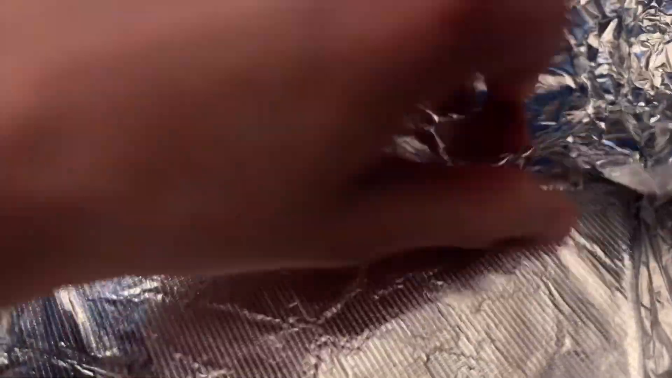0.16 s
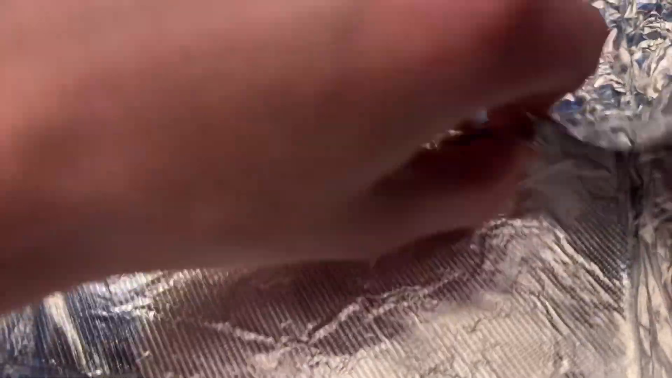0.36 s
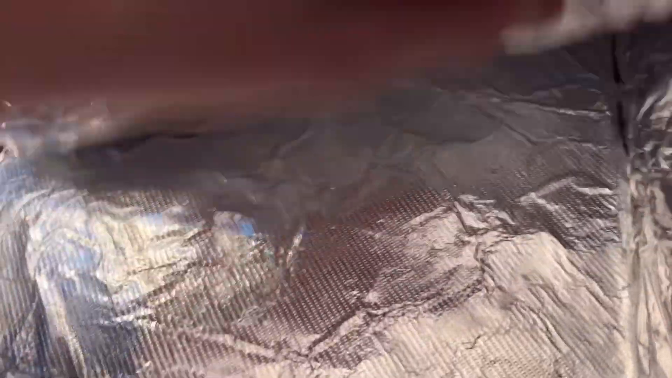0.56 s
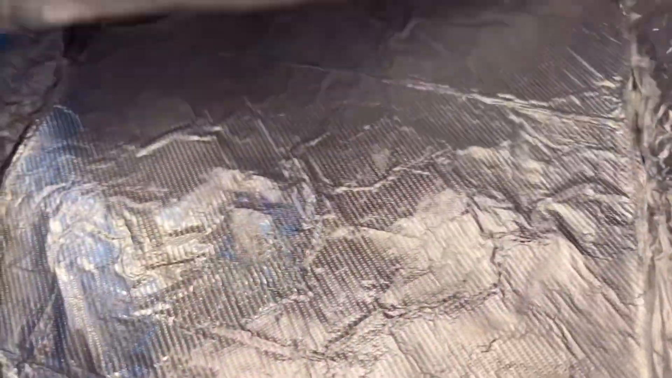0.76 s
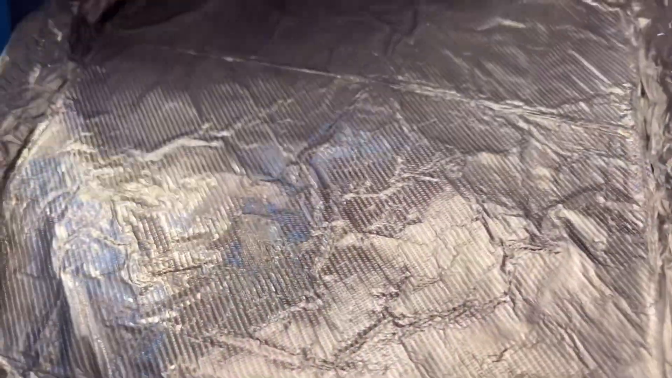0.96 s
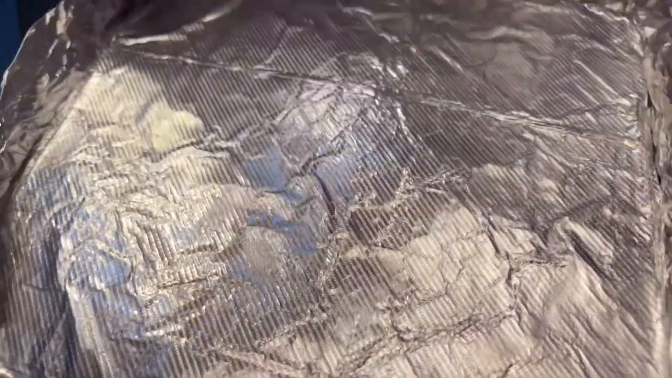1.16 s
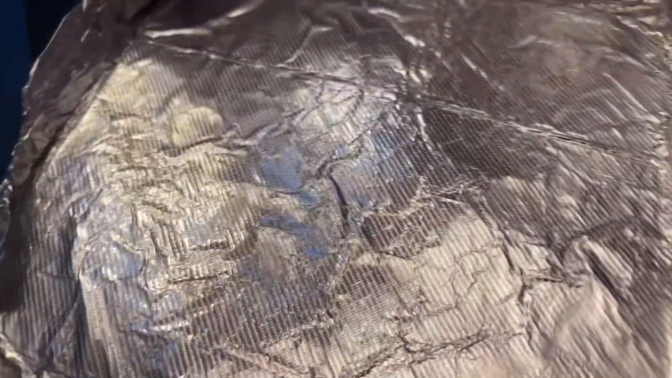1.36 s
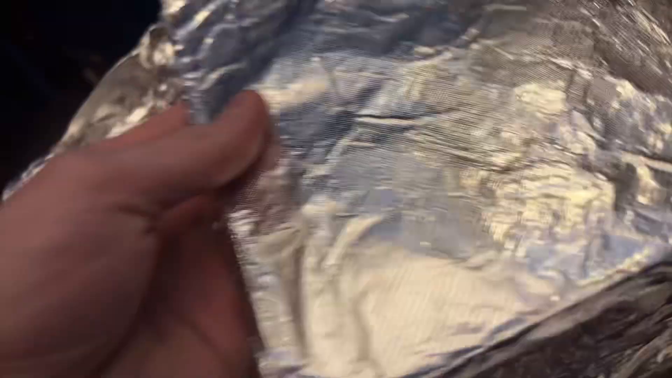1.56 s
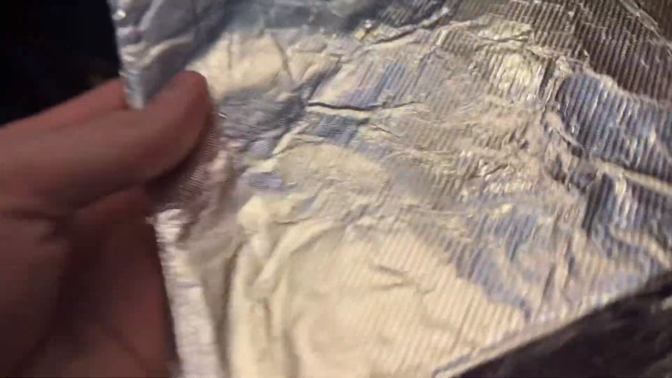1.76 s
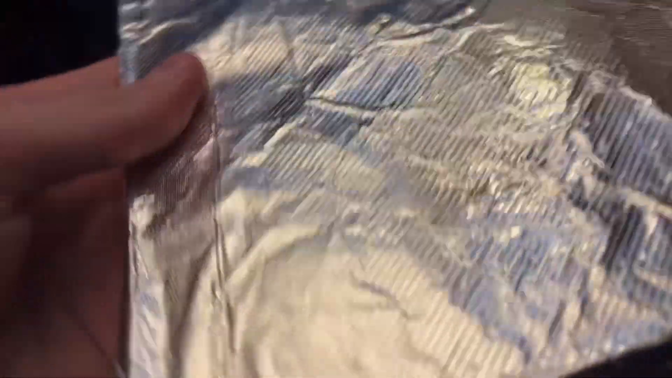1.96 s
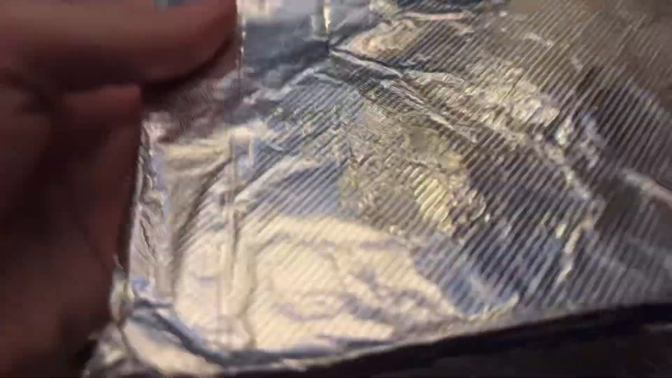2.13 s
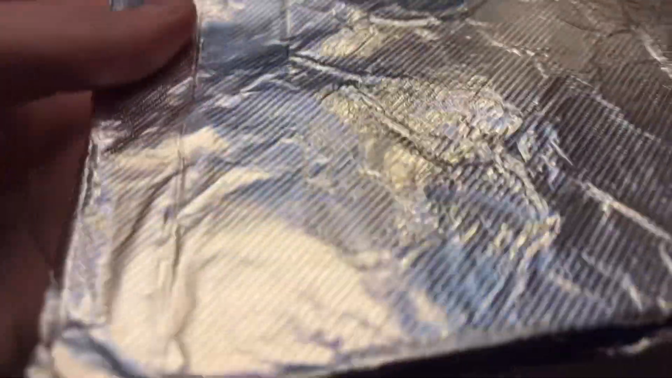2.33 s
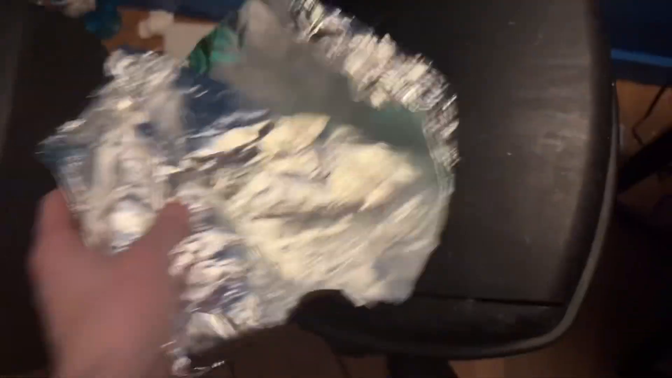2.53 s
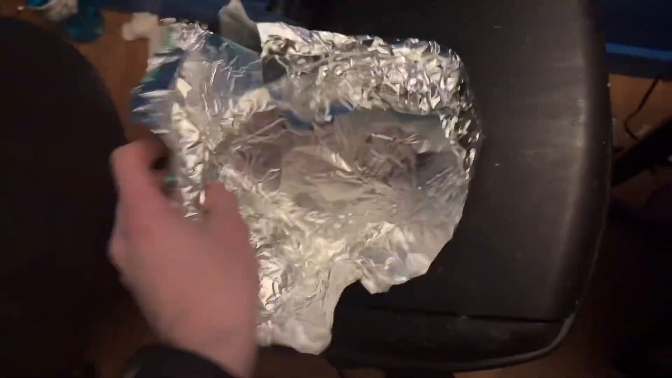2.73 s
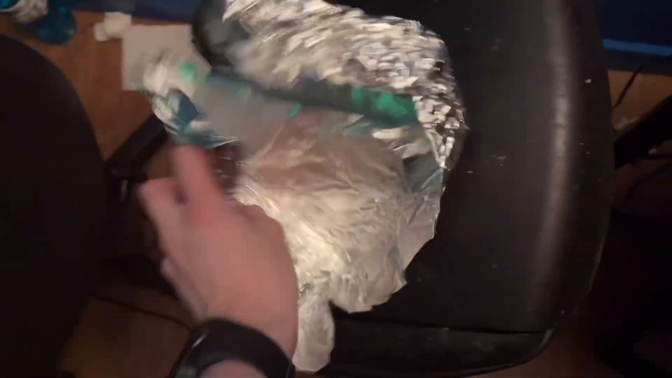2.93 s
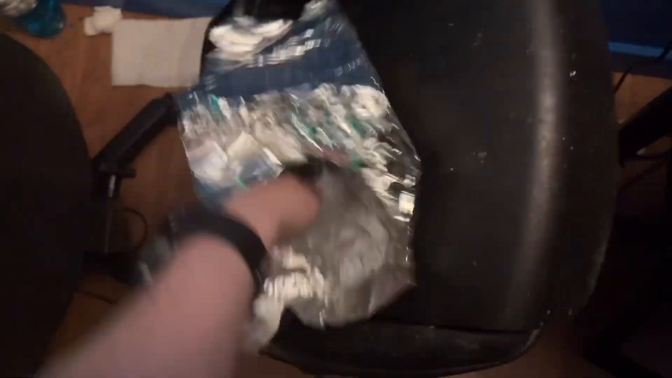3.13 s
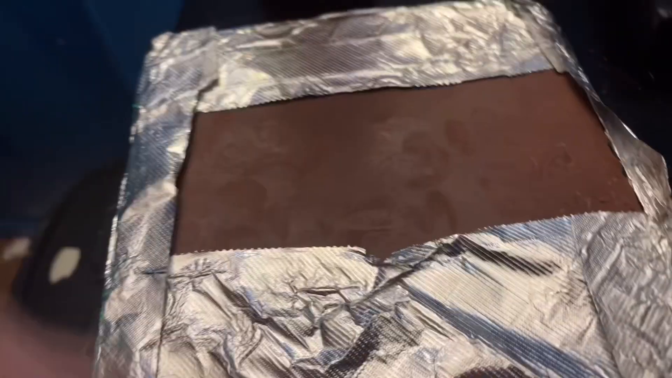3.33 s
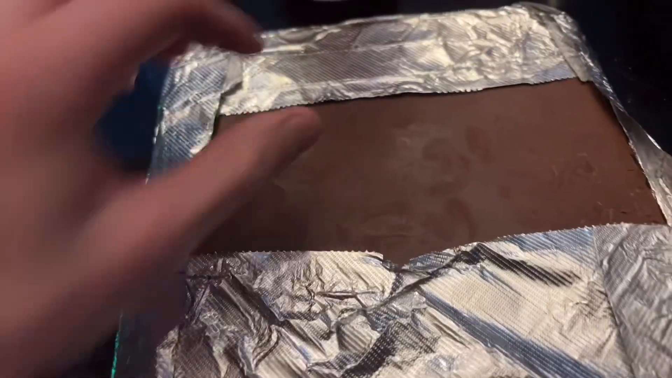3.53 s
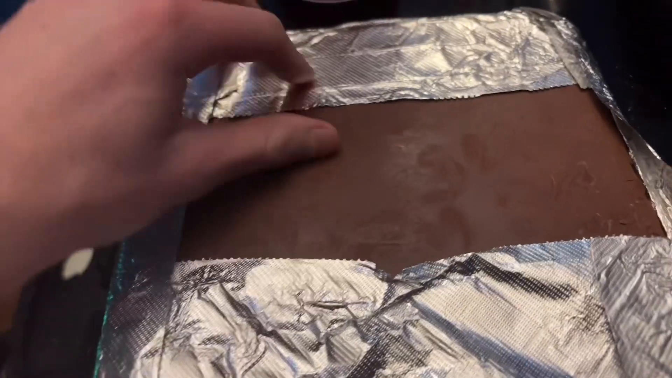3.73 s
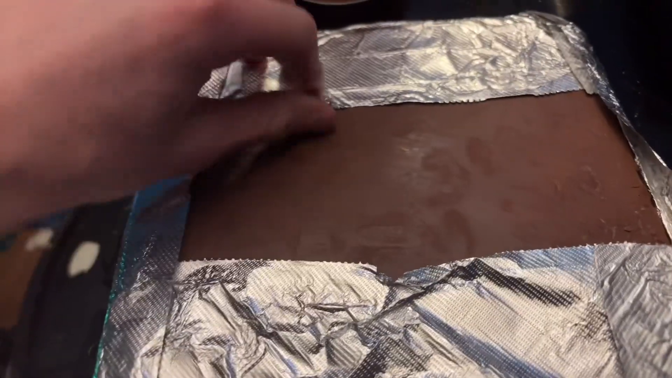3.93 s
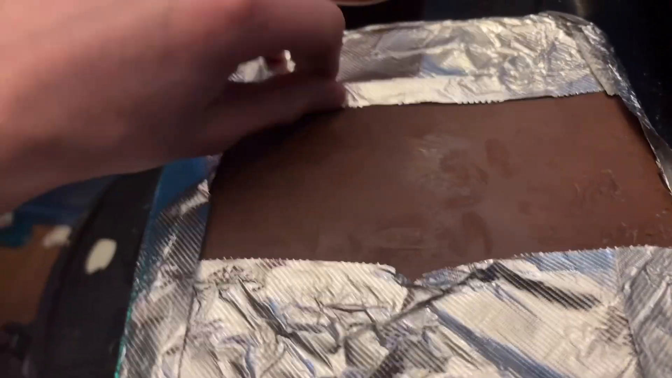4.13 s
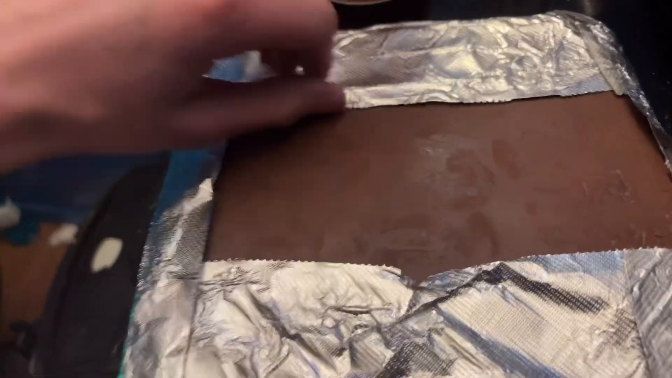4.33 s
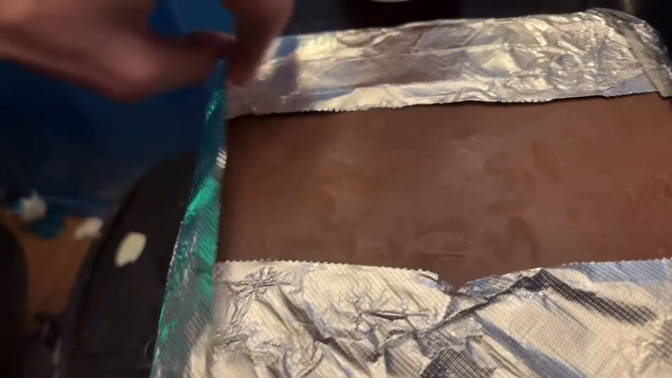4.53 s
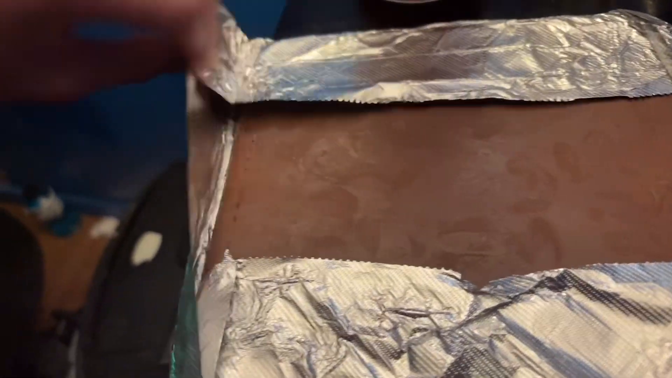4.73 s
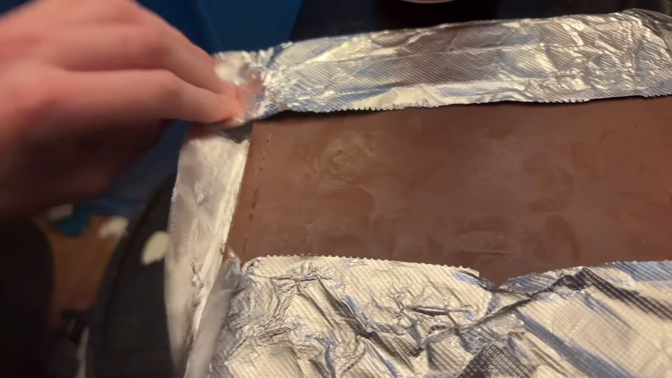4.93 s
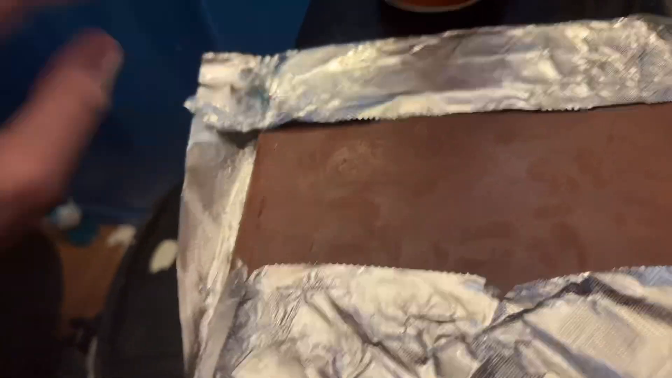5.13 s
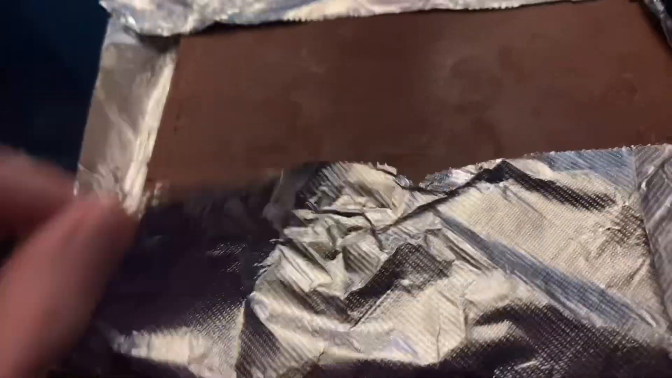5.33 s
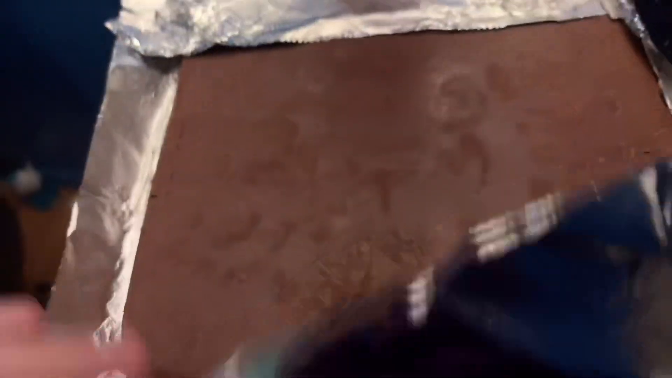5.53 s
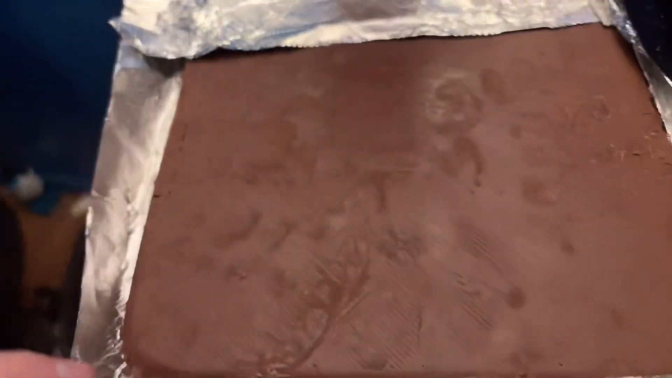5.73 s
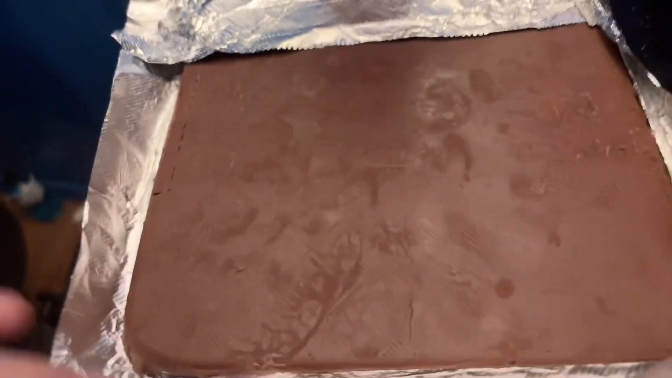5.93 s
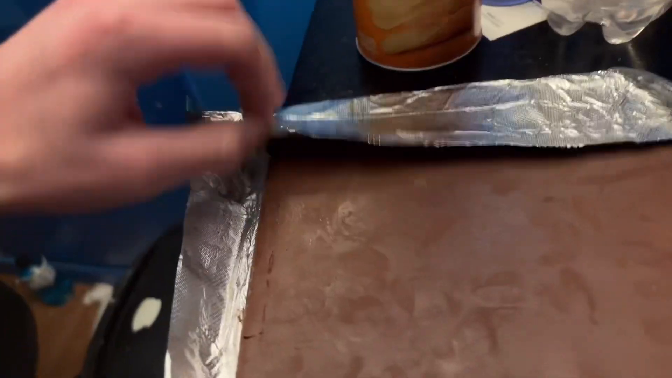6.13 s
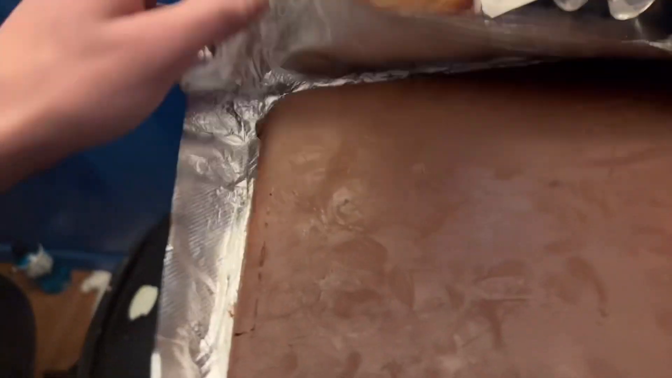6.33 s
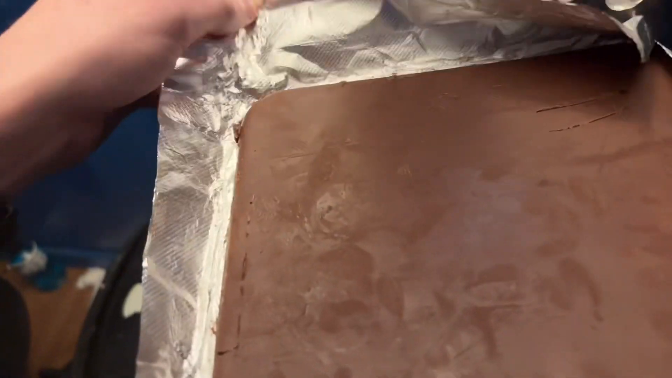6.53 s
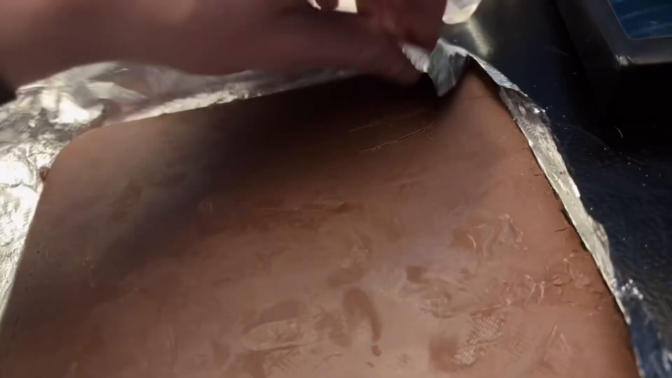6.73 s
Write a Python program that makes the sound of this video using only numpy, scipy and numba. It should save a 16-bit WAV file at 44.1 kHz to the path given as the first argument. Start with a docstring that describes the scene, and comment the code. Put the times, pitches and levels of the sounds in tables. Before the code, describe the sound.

Close, crisp crackling of foil being unwrapped from a chocolate slab, in stop-start spells over low flapping and soft microphone bumps.

```python
"""Aluminium foil is peeled, crumpled and torn by hand, close up in a quiet room.
Each crease buckles with a click that rings small patches of the sheet; big snaps set off showers of
smaller ones, and the sheet flaps in the bass. There are dull taps and pops, the loudest a finger
tapping a phone. The phone is also bumped now and then, and the room hums faintly.
The sound comes in short stretches that start and stop abruptly."""
import sys
import numpy as np
from scipy import signal
from scipy.fft import rfft, irfft
from scipy.io import wavfile
from scipy.ndimage import uniform_filter1d, minimum_filter1d
from numba import njit

SR = 44100
rng = np.random.default_rng(int(sys.argv[2]) if len(sys.argv) > 2 else 0)


def store_wav(level_fs):
    """Save 16-bit WAV to argv[1]."""
    pcm = np.round(np.clip(np.atleast_2d(level_fs), -1, 1) * 32767)
    wavfile.write(sys.argv[1], SR, pcm.T.astype(np.int16))


N = 298985

# Big snaps of the foil. "Sizzle" is the sound above 7 kHz, "body" the sound below 1 kHz.
# t/s, level/dB, f/Hz, relative sizzle/dB, shower length/s, relative shower level/dB
SNAPS = [(.058, -30, 3490, -20, 0.028, -11), (.1075, -16.5, 3690, -20, 0.0091, -9),
         (0.1195, -25, 3600, -31, 0.012, -2), (0.1333, -13, 3600, -21, 0.024, -9),
         (0.1645, -13.5, 3590, -17, 0.016, -11), (.186, -13, 4200, -35, .011, -9.5),
         (.21, -18, 2840, -23, 0.015, -1.5), (0.2245, -15, 3440, -25, 0.0059, -4),
         (0.241, -25, 4020, -13, 0.0093, -15), (.255, -10.5, 3870, -28, 0.0069, -19),
         (0.3395, -15, 3920, -26, 0.0031, -24), (0.3625, -9.5, 3650, -17, 0.0032, -25),
         (0.431, -26, 3460, -18, 0.0064, 2.5), (0.4423, -12.5, 3140, -23, 0.0069, -20),
         (.4583, -16, 4200, -22, .006, -0.5), (.4652, -7.5, 2080, -36, .011, -24),
         (0.523, -20.5, 3550, -24, .008, -2), (0.533, -16, 3960, -24, .008, -7),
         (0.577, -10.5, 2740, -44, .008, -1), (0.583, -16.5, 2900, -23.5, 0.037, -0.5),
         (0.6293, -19.5, 4040, -18, 0.0078, -0.5), (0.634, -19.5, 2800, -40, .035, -5),
         (0.668, -22, 3390, -33, 0.0083, 3), (0.681, -21, 2700, -17, 0.01, 1),
         (0.693, -13, 3160, -30, 0.02, -5), (0.7208, -8, 2070, -35, .01, 1.5),
         (0.725, -11.5, 3220, -27, 0.0087, 6), (.797, -13.5, 2980, -42, .01, -16),
         (0.811, -10.5, 2720, -22, 0.041, -11), (0.8838, -11.5, 2600, -50, 0.014, -8),
         (.935, -5.5, 2550, -25, 0.022, -11), (1.0004, -15.5, 3100, -29, .008, 3.5),
         (1.008, -16, 3410, -33, 0.0047, -10), (1.043, -14, 2950, -36, .004, -6),
         (1.063, -14.5, 2560, -33, 0.0067, 5.5), (1.074, -10.5, 3050, -23, 0.016, 0),
         (1.093, -12, 1850, -31, 0.023, -10), (1.115, -6, 2780, -43, .018, -2.5),
         (1.1312, -9, 1630, -40, 0.0084, 2.5), (1.161, -17, 2940, -31, 0.028, -7),
         (1.184, -12.5, 3360, -23, 0.01, -2), (1.197, -9, 3300, -29, 0.036, -8),
         (1.27, -13, 3530, -38, .025, -10.5), (1.301, -25, 3050, -24, 0.012, 6),
         (1.308, -17, 2270, -41, 0.027, -6.5), (1.398, -18, 1950, -38, 0.015, -2.5),
         (1.407, -21, 3060, -38, 0.012, -5), (1.434, -3, 3530, -30, 0.019, -7.5),
         (1.48, -14, 2400, -37, 0.028, -22), (1.517, -27.5, 2900, -18, 0.02, 2),
         (1.538, -6, 4430, -20, 0.0037, -13), (1.589, -24, 3300, -31, 0.014, -7),
         (1.598, -15, 2120, -47, 0.0052, -7), (1.938, -19, 3670, -38, 0.047, -18),
         (1.979, -27.5, 2770, -30, 0.021, 3), (1.997, -12.5, 3300, -30, 0.0049, -12),
         (1.9985, -16.5, 3320, -31, 0.025, -7.5), (2.065, -20, 3160, -31, 0.026, -7),
         (2.171, -23.5, 2170, -50, 0.021, 0.5), (2.249, -31, 3180, -41, 0.036, 1.5),
         (2.312, -22.5, 4000, -28, .016, -5.5), (2.328, -15, 1890, -45, 0.051, -15),
         (2.38, -21, 1420, -50, 0.019, -11), (2.464, -12.5, 2600, -34, .021, -1.5),
         (2.495, -16, 3190, -26, .01, -13), (2.5056, -17, 2880, -43, 0.041, -2),
         (2.5495, -15, 2390, -34, 0.047, -6), (2.597, -14, 2550, -41, 0.023, -7.5),
         (2.6636, -15.5, 2600, -36, 0.039, -23), (2.718, -16.5, 3020, -35, 0.014, -3),
         (2.768, -23.5, 3520, -25, 0.009, -4.5), (2.84, -22, 2800, -33, 0.011, -3),
         (2.877, -21.5, 2820, -28, 0.013, -1), (2.952, -11.5, 2190, -43, 0.03, -14),
         (2.991, -10, 2180, -37, 0.028, 1), (3.03, -5.5, 2200, -43, 0.0083, -7),
         (3.0462, -2.5, 2570, -34, .035, -9), (3.118, -10, 2360, -55, 0.024, -1.5),
         (3.148, -3.5, 2330, -51, 0.018, -19), (3.17, -7, 2140, -49, 0.039, -19.5),
         (3.208, -23, 2580, -41, 0.0068, -18), (3.261, -20.5, 1960, -38, 0.037, -2.5),
         (3.6674, -41, 2430, -33, 0.0048, 0), (3.6711, -23.5, 2370, -39, 0.018, -6),
         (3.732, -36, 2460, -36, 0.0086, -7), (3.826, -43.5, 2800, -30, 0.033, 0.5),
         (3.879, -33.5, 1610, -31, 0.03, -13), (3.961, -30.5, 3030, -39, 0.014, -8),
         (4.0693, -34, 2460, -31, 0.0092, 0), (4.0826, -31.5, 3180, -34, 0.0062, 0.5),
         (4.0903, -31, 3200, -22, 0.012, -8), (4.113, -30, 1580, -18, 0.0038, -9),
         (4.216, -42, 2410, -29, 0.031, -6), (4.258, -47, 3000, -15, 0.03, -1),
         (4.295, -28, 2590, -40, 0.0065, -15), (4.3484, -33.5, 2230, -28, 0.0083, -11),
         (4.366, -28.5, 2650, -24, 0.02, -9), (4.425, -36, 2740, -32, 0.012, -9),
         (4.442, -36, 2500, -38, 0.0097, -8), (4.465, -26.5, 2400, -38, .006, -11),
         (4.4724, -24, 2800, -32, 0.0098, -17), (4.4966, -21.5, 2350, -49, 0.0027, -14),
         (4.5185, -16.5, 3280, -36, .004, -21), (4.532, -14.5, 2500, -40, .011, -16),
         (4.55, -17, 2580, -35, 0.013, -10), (4.577, -31, 3300, -46, 0.0081, -5),
         (4.603, -23, 2510, -36, 0.0034, -8), (4.612, -27, 2660, -39, .012, -5),
         (4.664, -19, 2350, -48, 0.0081, -15.5), (4.679, -18, 2390, -41, 0.02, -6.5),
         (4.729, -26.5, 2460, -35, 0.0054, -21), (4.7615, -28.5, 2520, -32, 0.0086, -4),
         (4.772, -18.5, 2460, -48, .006, -27), (4.792, -19.5, 2460, -36, 0.014, -3),
         (4.842, -13, 2480, -48, 0.0079, -3), (4.854, -9.5, 3100, -27, 0.018, -10.5),
         (4.871, -9, 2380, -43, 0.012, -14), (4.899, -12, 2680, -36, 0.0072, -22),
         (4.9082, -23, 2190, -46, 0.0096, 0.5), (4.918, -11, 2590, -48, .007, -25),
         (4.94, -14, 2780, -46, 0.01, -29), (4.968, -25, 2480, -46, 0.037, -3.5),
         (5.183, -26, 2300, -37, 0.016, -17), (5.1922, -20, 2630, -27.5, 0.0088, 1),
         (5.201, -20, 2310, -37, 0.015, -12), (5.2382, -5, 3300, -36, 0.0033, -21),
         (5.265, -12, 1530, -33, 0.017, -15), (5.291, -23, 2880, -45, 0.008, 3.5),
         (5.3014, -20, 2970, -27, 0.018, 1), (5.331, -22.5, 2120, -46, 0.021, -5),
         (5.379, -40, 3360, -16, 0.014, -6), (5.3932, -7, 2750, -42, 0.013, -14),
         (5.417, -28.5, 2870, -41, 0.028, -2), (5.448, -19, 2170, -25.5, 0.017, -4),
         (5.49, -27.5, 2800, -40, 0.012, 0), (5.5185, -19.5, 3030, -44, 0.0077, 4.5),
         (5.5283, -14, 1770, -43, 0.013, -10), (5.539, -14, 2230, -43, 0.02, -5.5),
         (5.557, -17.5, 2460, -40, 0.031, -15), (5.5833, -12, 2550, -31.5, 0.015, -4.5),
         (5.606, -21, 2460, -38, 0.022, -11), (5.6524, -21.5, 1340, -34, 0.0055, 0),
         (5.665, -12.5, 2190, -34, 0.0066, -4), (5.67, -14, 3500, -30, 0.019, -7),
         (5.697, -22, 2780, -40, .01, -4), (5.71, -27, 2800, -42, 0.014, -14),
         (5.8, -28.5, 2500, -45, 0.022, -9), (5.836, -28, 2590, -34, 0.028, -24),
         (5.9986, -30, 1920, -28, 0.0073, -5), (6.027, -29.5, 2740, -42, 0.023, -8),
         (6.062, -37, 3000, -21, 0.011, -5), (6.1462, -29.5, 3040, -24, 0.016, -5.5),
         (6.16, -19, 2800, -37, 0.0079, -5), (6.2, -31.5, 2800, -34, 0.0075, -1),
         (6.219, -26.5, 3900, -26, .016, -3), (6.24, -26, 2500, -38, 0.011, 0),
         (6.254, -19.5, 2930, -37, 0.018, -1), (6.282, -34, 3050, -38, 0.0087, -17),
         (6.292, -21, 2650, -36, 0.025, 1), (6.3243, -12, 2630, -34, .012, -6.5),
         (6.336, -14.5, 1450, -37, 0.0078, -6), (6.343, -17, 3000, -35, 0.0089, 1),
         (6.354, -18, 2900, -45, 0.01, 1), (6.363, -18, 2940, -29, 0.0041, 2),
         (6.382, -15, 3340, -31, .016, -16), (6.4023, -4, 2440, -42, 0.0063, -6),
         (6.409, -6, 3070, -36, .006, -12), (6.415, -12, 2900, -53, .005, 1),
         (6.449, -10, 2920, -42, 0.0086, -11), (6.4626, -6.5, 2630, -45, 0.0093, -16),
         (6.4774, -9.5, 2270, -40, 0.022, -6), (6.504, -3, 2800, -43, 0.0093, -10),
         (6.572, -19.5, 2800, -42, 0.016, -3.5), (6.596, -14.5, 1420, -46, 0.0061, -15),
         (6.611, -18, 3250, -26, 0.0055, -15), (6.632, -6.5, 2300, -36, 0.0081, -7.5),
         (6.7187, -16, 1900, -40, .007, -20), (6.7485, -13, 3300, -29, 0.013, -12),
         (6.7625, -13.5, 2690, -34, .012, -14)]
def snaps():
    """A crease gives way with a loud ringing crack, then a fading shower of smaller clicks follows."""
    start, db, hz, sizzle_db, length, shower_db = np.transpose(SNAPS)[:, :, None]
    body_db = -21 - 11 * np.log2(hz / 2800)  # lower patches are bigger and have more body
    first = [v.ravel() for v in (start, db + 2.5, hz, sizzle_db + 3.5, body_db - 8)]
    cracks = clicks(*first, count=40, cycles=30, focus=.24, rest=.18, loose=.68)
    late, size, pitch = np.moveaxis(rng.random((len(start), 3, 16)), 1, 0)  # 16 clicks a shower
    length = np.clip(length, .002, .06)
    # a longer shower has no more clicks, so each is made bigger
    offset_db = shower_db + 10 * np.log10(length / .027) - 6 * late ** 2 + 7 * (size - .5)
    shower_hz = hz * np.exp(.6 * (pitch - .5))
    columns = (start + length * late, db + offset_db, shower_hz, sizzle_db + 6.5, body_db + .5)
    shower = [v.ravel() for v in np.broadcast_arrays(*columns)]
    return cracks + clicks(*shower, count=20, cycles=9.7, focus=.35, rest=.35, loose=1)


def rustle(pull_db, sizzle_db, body_db, clicks_per_s=2600, settle_s=.027):
    """Many tiny creases patter in clumps, louder as the hand pulls and just after each snap."""
    snap_s, snap_db = np.transpose(SNAPS)[:2]
    jolts = np.zeros(N)
    jolts[(snap_s * SR).astype(int)] = undb(snap_db - 27) ** 2
    settling = signal.lfilter([1], [1, -np.exp(-2 / (settle_s * SR))], jolts)
    rustle_db = 10 * np.log10(undb(pull_db) ** 2 + settling)
    when, size, pitch = rng.random((int(clicks_per_s * N / SR), 3)).T
    at = (when * N).astype(int)
    clump_db = 2.4 * wander(70)
    size_db = 3.07 * np.minimum(-np.log(1 - size), 3)  # many small, few large
    db = rustle_db[at] - 12.5 + size_db + clump_db[at]
    return clicks(at / SR, db, 1500 * 2.03 ** pitch, sizzle_db[at], body_db[at],
                  count=11, cycles=9.1, focus=.35, rest=.5, loose=.96)


def clicks(start_s, db, pitch_hz, sizzle_db, body_db, count, cycles, focus, rest, loose):
    """Each buckle rings `count` patches of foil from low to high, favouring those near its own pitch."""
    scatter, decay, turn = np.moveaxis(rng.random((len(start_s), 3, count)), 1, 0)
    place = (np.arange(count) + scatter) / count
    hz = 280 + 15600 * place ** 2
    t60 = np.clip(cycles * (.5 + decay) / np.clip(hz, 900, 6000), .0005, .03)
    zone = (hz > 1000).astype(int) + (hz > 7000)  # 0 body, 1 middle, 2 sizzle
    # a hump around the pitch, `focus` wide, on a floor of height `rest`
    middle = rest + np.exp(-.5 * (np.log(hz / pitch_hz[:, None]) / focus) ** 2)
    # the offsets allow for the foil's tone, which weakens both ends
    body, sizzle = undb(body_db + 21), undb(sizzle_db + 28.5)
    weight = np.choose(zone, [body[:, None], middle, sizzle[:, None]])
    even_energy = np.sqrt((place + .05) / count * .12 / t60)  # same energy per Hz before weighting
    size = undb(db)[:, None] * weight * even_energy
    start = (start_s[:, None] * SR + np.zeros_like(hz)).astype(np.int64)
    phase = 2 * np.pi * loose * turn  # less loose: patches start in step and crack more sharply
    out = np.zeros(N)
    for k, (edge_hz, kind) in enumerate([(1000, "low"), ([1000, 7000], "band"), (7000, "high")]):
        tones = ring(*(v[zone == k] for v in (start, hz, t60, size, phase)), N)
        out += signal.sosfilt(signal.butter(4, edge_hz, kind, fs=SR, output="sos"), tones)
    return out


@njit
def ring(start, hz, t60, size, phase, n):
    """Struck things ring: each tone swells quickly, then fades at 60 dB per t60 seconds."""
    out = np.zeros(n)
    for k in range(len(hz)):
        fade = np.log(1000) / (t60[k] * SR)
        step, swell_step = np.exp(2j * np.pi * hz[k] / SR - fade), np.exp(-6 * fade)
        tone, held_back = size[k] * np.exp(1j * phase[k]), 1.
        for i in range(start[k], min(n, start[k] + int(t60[k] * SR / 2))):
            out[i] += tone.imag * (1 - held_back)
            tone *= step
            held_back *= swell_step
    return out


# The foil's bright tone: f/Hz, level/dB
FOIL_TONE = [(150, -35.5), (250, -12.5), (400, -13.5), (750, -11), (1330, 0.5), (1760, -2), (2160, 1),
             (3280, 4), (4570, 0.5), (6250, -14.5), (7300, -39.5), (9300, -35.5), (11000, -39.5),
             (13300, -35.5), (16000, -45)]
def foil(pull_db, sizzle_db, body_db):
    """Rustle and snaps ring the same sheet, so they share its tone."""
    return colour(rustle(pull_db, sizzle_db, body_db) + snaps(), FOIL_TONE)


# The deep tone of the flapping sheet: f/Hz, level/dB
FLAP_TONE = [(15, -39), (25, -29.5), (54, 1.5), (102, 1.5), (146, 2), (257, -7), (317, -3), (370, -11),
             (520, -31), (880, -120)]
# How loud the flapping is at full pull: t/s, level/dB
FLAP_LEVELS = [(0, -41), (.45, -37.5), (.7, -36), (1, -37.5), (1.4, -34), (1.6, -30), (2.4, -29),
               (2.55, -37), (3.2, -37.5), (3.4, -27.5), (4.4, -38.5), (4.9, -41.5), (5.5, -39),
               (6.1, -34.5), (6.45, -39), (6.78, -29.5)]
def flapping(t, pull_db, full_pull_db=-16):
    """The sheet flaps with an uneven rumble that grows as the hand pulls harder."""
    db = np.interp(t, *np.transpose(FLAP_LEVELS)) + .88 * (pull_db - full_pull_db) + 3 * wander(25)
    return noise(FLAP_TONE) * undb(db)


# Dull taps and pops: t/s, level/dB, f/Hz (how far the pitch dives), boom level/dB
TAPS_AND_POPS = [(2.3254, -31, 930, -32.5), (3.6835, -35, 494, -30.5), (4.179, -63, 1020, -44),
                 (4.2717, -11, 2080, -26), (5.0565, -12.5, 2100, -25), (5.071, -43, 1090, -33),
                 (5.137, -36, 1730, -46), (5.8732, -10.5, 2030, -24), (3.169, -23, 900, -26),
                 (6.599, -36, 1110, -28)]
def taps_and_pops():
    """Each is a click that dives in pitch into a low boom; the loudest are a finger tapping the phone."""
    out, t = np.zeros(N + SR), np.arange(SR // 8) / SR
    for start_s, db, dive_hz, boom_db in TAPS_AND_POPS:
        cycles = t * dive_hz
        hz = 64 + dive_hz / (1 + (cycles / 2.77) ** 2)
        swell = 1 - np.exp(-(cycles / .6) ** 2)
        fade = undb(db) * np.exp(-cycles / 1.27) + undb(boom_db) * np.exp(-t / .021)
        at = int(start_s * SR)
        out[at:at + len(t)] += fade * swell * np.sin(2 * np.pi * np.cumsum(hz) / SR)
    return out[:N]


# Bumps on the phone: t/s, level/dB, f/Hz, time to fade by 60 dB/s
BUMPS = [(0.121, -39, 51.4, 0.11), (0.449, -48, 152, 0.054), (.584, -40, 121, .08), (0.739, -21, 70, 0.14),
         (1.115, -21, 110, 0.12), (1.393, -19, 141, 0.068), (1.508, -28, 74.5, 0.1), (1.58, -28, 88, .1),
         (1.981, -19, 110, 0.087), (2.07, -27, 67, 0.13), (2.335, -26, 50, .15), (2.467, -22.5, 107, 0.11),
         (3.04, -18.5, 194, 0.12), (3.175, -23, 68, 0.098), (3.276, -8, 72, 0.073), (3.473, -38, 54, .1),
         (4.064, -38, 53.8, 0.14), (4.209, -33, 59, .08), (4.426, -45, 56, .08), (4.537, -39, 100, .06),
         (4.841, -60, 98, 0.062), (5.062, -27.5, 46, 0.1), (5.519, -48, 75, 0.09), (5.662, -40, 135, 0.096),
         (5.69, -33, 50, 0.17), (5.879, -26, 46, 0.083), (6.017, -34, 65, .1), (6.201, -34, 61.6, .1),
         (6.301, -33.5, 202, 0.2), (6.468, -29.5, 212, 0.19), (6.599, -24, 70, 0.11), (6.69, -35, 54.6, .1)]
def bumps():
    """Each soft knock on the phone rings one low, muffled tone."""
    start_s, db, hz, t60 = np.transpose(BUMPS)
    start = (start_s * SR).astype(np.int64)
    knocks = ring(start, hz, np.clip(t60, .02, .5), undb(db), np.zeros_like(hz), N)
    return signal.sosfilt(signal.butter(2, 350, fs=SR, output="sos"), knocks)


def echo(x):
    """The sheet shimmers after each click and the walls answer, with a slightly changing sound."""
    t = np.arange(SR // 5) / SR
    choice = np.repeat(rng.integers(0, 6, len(x) // 882 + 1), 882)[:len(x)]  # pick a tail every 20 ms
    shimmer = undb(-34) * np.exp(-t / .0045)
    walls = undb(-39) * np.exp(-t / .032)
    tails = rng.standard_normal((6, len(t))) * (shimmer + walls)
    return x + sum(signal.oaconvolve(x * (choice == k), tail)[:len(x)] for k, tail in enumerate(tails))


# The tone of the quiet room: f/Hz, level/dB
ROOM_TONE = [(18, -8.5), (30, -17), (59, -8), (77, -7), (93, -33), (127, -21), (160, -25), (320, -23.5),
             (384, -26.5), (700, -39.5), (1200, -28), (1600, -31), (2410, -26.5), (4300, -44.5),
             (7500, -56), (15500, -58.5)]
def room(whine_hz=3880, whine_db=-22.5):
    """A low hum, the hiss of air and one thin, wavering whine."""
    whine = np.sqrt(2) * np.sin(2 * np.pi * np.cumsum(whine_hz + 8 * wander(40)) / SR)
    return noise(ROOM_TONE) + undb(whine_db + 1.1 * wander(22)) * whine


def undb(db):
    """Turn decibels into a number to multiply by."""
    return 10 ** (np.asarray(db) / 20)


def wander(rate):
    """A random value that glides to a new target `rate` times a second, mostly within -1 to 1."""
    hold = int(SR / rate)
    return uniform_filter1d(np.repeat(rng.standard_normal(N // hold + 1), hold), hold)[:N]


def noise(tone):
    """Noise with the given tone, scaled to an average (rms) size of 1."""
    x = colour(rng.standard_normal(N), tone)
    return x / np.sqrt(np.mean(x ** 2))


def colour(x, tone, size=8192):
    """Turn lows and highs up or down along a curve of (Hz, dB) points."""
    hz, db = np.transpose(tone)
    grid_hz = np.arange(size // 2 + 1) * SR / size + 1
    gain = undb(np.interp(np.log(grid_hz), np.log(hz), db))
    # fold the filter in time so that it rings after a click, never before
    cepstrum = irfft(np.log(gain))
    cepstrum[1:size // 2] *= 2
    cepstrum[size // 2 + 1:] = 0
    response = irfft(np.exp(rfft(cepstrum)))[:size // 2]
    return signal.fftconvolve(x, response)[:len(x)]


# How hard the hand works the foil, one list a passage: t/s, level/dB, relative body/dB
HAND_PULL = [
    [(0.0, -31, -23), (0.1, -40, -21), (0.106, -27.5, -24), (0.23, -25, -19), (0.318, -43.5, -20),
     (0.34, -38, -30), (0.406, -47, -22), (0.46, -31, -33), (0.504, -44, -11), (0.52, -37, -13)],
    [(0.526, -29, -17), (0.71, -19, -15), (0.726, -13, -6.5), (0.768, -27.5, -24), (0.81, -20.5, -11),
     (0.928, -45.5, -5), (0.936, -16.5, -27), (0.986, -41, -17), (1.008, -30, -17), (1.058, -32, -14)],
    [(1.064, -14, -12), (1.212, -19.5, -23), (1.25, -25, -16), (1.268, -26.5, -29), (1.384, -30.5, -3.5),
     (1.398, -18, -11), (1.428, -22.5, -9.5), (1.434, -16, -32), (1.512, -32, -12), (1.546, -31, -32)],
    [(1.563, -37, -14), (1.597, -28, -8.5), (1.639, -35, -6.5), (1.812, -37.5, -13), (1.98, -26.5, -9),
     (2.006, -27, -15), (2.014, -27, -13.5), (2.14, -31.5, -6.5), (2.32, -31.5, -16), (2.439, -37.5, -4)],
    [(2.44, -48, -7), (2.458, -63, 17), (2.46, -40, -6), (2.463, -23, -5)],
    [(2.465, -17, -1), (2.5, -13.5, -23.5), (2.692, -26, -15.5), (2.718, -18, -20), (2.782, -28, -9),
     (2.912, -21.5, -21.5), (3.008, -9, -15), (3.158, -14, -18), (3.238, -27, -10.5), (3.3, -19, -4)],
    [(3.3, -52, -11), (3.32, -79, -8), (3.632, -63, -14), (3.678, -29, -7.5), (3.712, -52.5, -1),
     (4.12, -47, -28), (4.142, -59, -18), (4.292, -45.5, -6), (4.374, -41.5, -24), (4.397, -52, -3)],
    [(4.404, -66, -9), (4.407, -60, -28), (4.473, -35.5, -12), (4.763, -37.5, -12.5), (4.879, -17.5, -17.5),
     (4.981, -35, -18), (5.045, -51, -7), (5.057, -36, -5), (5.083, -65, 11), (5.159, -58, -5)],
    [(5.162, -37, -14), (5.2, -30.5, -19), (5.492, -38, -19), (5.534, -17.5, -22), (5.646, -36, -12),
     (5.672, -19, -14), (5.768, -45.5, -16), (5.878, -41.5, 1), (5.906, -77, 7), (5.975, -58, -3)],
    [(5.975, -35, -12), (6.141, -55, -12), (6.163, -41, -37), (6.187, -51.5, -35), (6.307, -19, -26.5),
     (6.513, -27.5, -8), (6.547, -39, -12), (6.639, -30.5, -14), (6.655, -35.5, -13), (6.78, -20.5, -16)],
]
# Stretches of sound, some with tiny silences between: start t/s, end t/s, crackle on (1) or off (0)
STRETCHES = [(0, 1.5455, 1), (1.5635, 2.4388, 1), (2.4392, 2.4638, 0), (2.4642, 3.3003, 1),
             (3.3005, 4.397, 1), (4.4035, 5.1585, 1), (5.162, 5.9752, 1), (5.9754, 6.7303, 1),
             (6.7385, 6.78, 1)]
# One row for each stretch: room level/dB, relative sizzle of the rustle/dB
STRETCH_LEVELS = [(-50, -19.5), (-47.5, -42), (-47.5, -32), (-65, -33.5), (-51, -22), (-49, -37),
                  (-48.5, -55), (-50.5, -46), (-41, -41)]
def scene():
    """Crackling foil over flaps, taps, bumps and the room; each stretch stops dead, echoes and all."""
    t = np.arange(N) / SR
    pull_s, *columns = np.transpose(np.vstack(HAND_PULL))
    pull_db, body_db = (np.interp(t, pull_s, column) for column in columns)
    stretch = np.searchsorted(np.transpose(STRETCHES)[0], t, "right") - 1
    room_db, sizzle_db = np.transpose(STRETCH_LEVELS)[:, stretch]
    crackle = foil(pull_db, sizzle_db, body_db)
    backing = flapping(t, pull_db) + taps_and_pops() + bumps() + undb(room_db) * room()
    out = np.zeros(N)
    for start_s, end_s, crackle_on in STRETCHES:
        span = slice(int(start_s * SR), min(int(end_s * SR), N))
        out[span] = crackle_on * echo(crackle[span]) + backing[span]
    return out[None]


def record(dry, ceiling_db=-1, top_hz=16500):
    """A limiter briefly turns down the loudest snaps, then the highest treble is cut away."""
    needed_gain = np.minimum(1, undb(ceiling_db) / (np.abs(dry) + 1e-9))
    gain = uniform_filter1d(minimum_filter1d(needed_gain, size=257), size=128)
    return signal.sosfilt(signal.cheby2(12, 70, top_hz, fs=SR, output="sos"), dry * gain)


dry = scene()
out = record(dry)
store_wav(out)
```